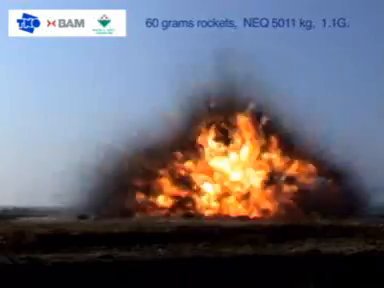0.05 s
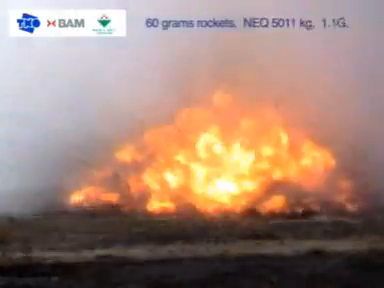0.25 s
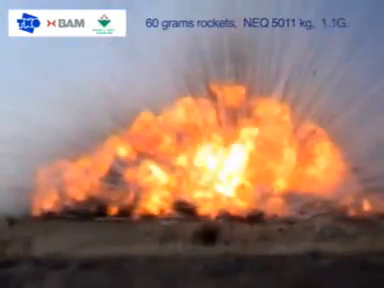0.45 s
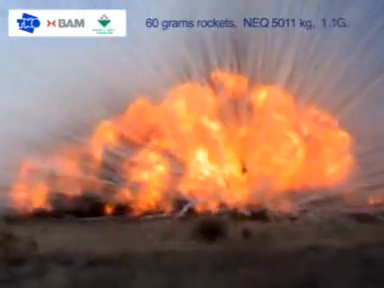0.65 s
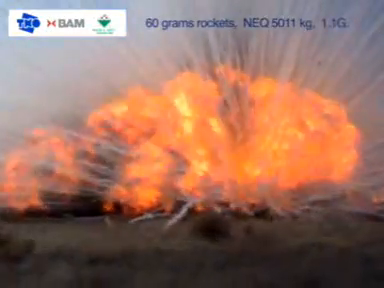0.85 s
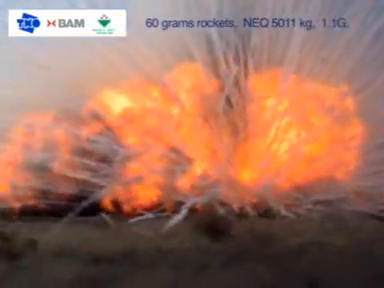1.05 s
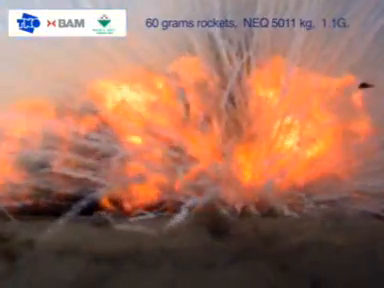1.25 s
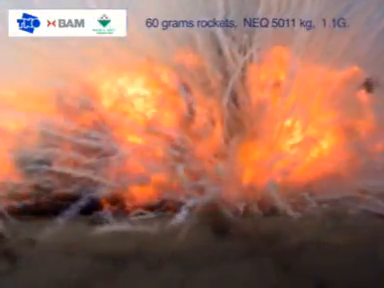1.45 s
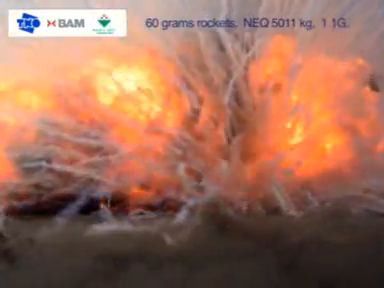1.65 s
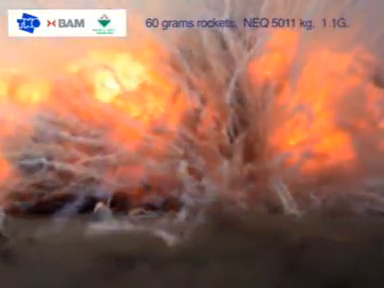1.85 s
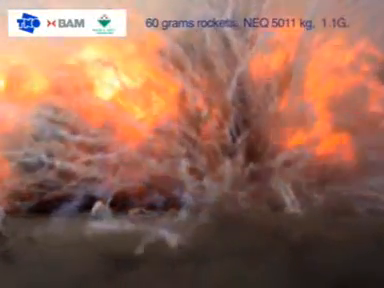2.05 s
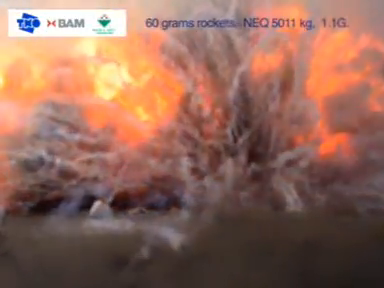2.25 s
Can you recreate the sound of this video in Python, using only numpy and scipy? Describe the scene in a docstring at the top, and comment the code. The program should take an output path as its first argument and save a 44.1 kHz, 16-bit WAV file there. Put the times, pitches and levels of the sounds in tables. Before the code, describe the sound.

A fireworks stockpile explodes far across an open field. After faint wind, ground shock knocks and rattles the microphone stand at 0.2 seconds. Sharp cracks hit at 0.35 seconds, opening into a loud, dense roar that overloads the microphone. From 1.1 seconds the roar eases into deep rumble with scattered distant booms, continuing until about 2.3 seconds. A few nearer rockets hiss briefly past around 1.4 seconds.

```python
"""A stockpile of fireworks explodes far off across an open field: thousands of rockets burst in a dense
roar over deep rumble and single booms, and a few nearer ones hiss past. The ground shock reaches the
microphone first and shakes the camera stand; then the air blast cracks in. Light wind comes before both.
The microphone overloads, and the roar chokes for a few milliseconds now and then."""
import sys
import numpy as np
from scipy import signal
from scipy.fft import rfft, irfft
from scipy.io import wavfile
from scipy.ndimage import uniform_filter1d

SR = 44100
rng = np.random.default_rng(int(sys.argv[2]) if len(sys.argv) > 2 else 0)


def master(y):
    """Save y as 16-bit WAV."""
    cut = np.clip(np.atleast_2d(y).T, -1, 1)
    pcm = np.round(cut * 32767)  # scale
    wavfile.write(sys.argv[1], SR, pcm.astype(np.int16))


N = 101429
T = np.arange(N) / SR
F = np.maximum(np.arange(N // 2 + 1) * SR / N, 1)
SHOCK_S, BLAST_S = .2065, .353  # arrival through the soil, then through the air

# Course of the explosion. Each row: time in seconds, then rumble, body, middle and treble in dB.
BLAST_LEVELS = [(.352, -19, -22, -14, -17), (.363, -14, -43, -21, -21), (.374, -43, -60, -29, -16.5),
                (.376, -24, -30, -21, 3), (.384, -29, -20, -42, -22.5), (.389, -19, -9, -0.5, -7),
                (.411, -17, -5.5, -3, -9.5), (.42, -18, -5, -8, -12.5), (.44, -19, -2, -11, -13.5),
                (.61, -18, -4.5, -6, -7.5), (.7, -12, -10, -9, -12.5), (.9, -13, -10, -10.5, -21.5),
                (.95, -9.5, -14.5, -13, -24), (1.07, -10.5, -10, -11.5, -23),
                (1.1, -7.5, -18.5, -18.5, -31.5), (1.28, -12, -19, -25, -26),
                (1.42, -12.5, -20, -24.5, -24.5), (1.52, -9, -21.5, -24.5, -26.5),
                (1.57, -14, -27.5, -32, -33.5), (1.68, -15, -21, -26.5, -30),
                (1.74, -21, -26.5, -27.5, -34), (1.78, -14.5, -24, -31, -28),
                (1.81, -13.5, -26, -29, -34.5), (1.86, -15, -25, -28, -31.5), (1.91, -14.5, -28, -29, -36),
                (2.03, -18.5, -31.5, -25, -38.5), (2.08, -19.5, -28.5, -31, -36.5),
                (2.3, -20.5, -26, -28.5, -37)]


def roar():
    """Countless distant bursts merge in three bands that swell, flicker and choke."""
    # Colour of the bursts. Each row: frequency in Hz, spectral level in dB.
    colour = [(92, -8), (177, -7.5), (246, -12), (752, -9.5), (1690, -14), (2240, -14), (8590, -23.5),
              (12900, -28), (16800, -65), (22000, -120)]
    # Body, middle and treble. Each row: centre in Hz, half-width in octaves.
    bands = [(520, 1.57), (2200, 1.125), (6500, 1.39)]
    # Moments when the roar chokes. Each row: time in seconds, length in seconds, dip in dB.
    chokes = [(.4148, .006, -14), (.7094, .003, -11), (.7278, .003, -11), (.7724, .004, -11),
              (.7829, .003, -13), (.8759, .004, -11), (.9154, .003, -12), (.9329, .004, -18),
              (.9372, .003, -17), (.9422, .003, -12), (1.0388, .004, -11), (1.0945, .004, -14),
              (1.1018, .005, -15), (1.1277, .002, -10), (1.1635, .003, -8), (1.1774, .002, -9),
              (1.1813, .002, -8)]
    bursts = spread(*(scatter(per_s=2500, spread_db=3, share=.3) for _ in range(2)))
    spectrum = rfft(bursts) * undb(along_hz(colour))
    flicker_db = .8 * walk(rate_hz=25.06)
    choke_db = sum(db * bump(s, length, order=4) for s, length, db in chokes)
    out = 0
    for column, (hz, octaves) in enumerate(bands, start=2):
        layer = unit(irfft(spectrum * np.exp(-(np.log2(F / hz) / octaves) ** 2), N))
        level_db = curve(BLAST_LEVELS, column) + flicker_db + choke_db + .5 * walk(rate_hz=12.08)
        out = out + layer * undb(level_db)
    return out * (T > BLAST_S)


def rumble():
    """Overlapping booms roll across the field beneath the roar."""
    # Colour of the rumble. Each row: frequency in Hz, spectral level in dB.
    colour = [(20, -6.5), (40, 2.5), (70, 2.5), (100, -1.5), (140, -6.5), (200, -16), (300, -21.5),
              (600, -35), (22000, -90)]
    bangs = spread(scatter(per_s=45, spread_db=2, share=.3), rng.standard_normal(N))
    deep = unit(irfft(rfft(bangs) * undb(along_hz(colour)), N))
    return deep * undb(curve(BLAST_LEVELS)) * (T > BLAST_S)


def cracks():
    """The front of the air blast reaches the microphone as short, sharp reports."""
    # Each row: start in seconds, level in dB, pitch in Hz.
    reports = [(.353, 12, 2200), (.356, 8, 1900), (.363, 12, 1900), (.3643, 10, 1900), (.3755, 9, 2200),
               (.378, 7, 1900), (.3873, 6, 1500)]
    return sum(-ring(clicks([(s, db)]), hz, t60_s=.0012) for s, db, hz in reports)


def booms():
    """Single far explosions stand out as deep thuds with a soft front."""
    # Each row: start in seconds, level ahead of the softening filter in dB, pitch in Hz.
    blasts = [(1.114, -2.5, 190), (1.16, -5.5, 141), (1.317, -11, 119), (1.552, -5, 113.4), (1.675, -6, 89),
              (1.727, -4, 87), (1.76, -5, 94.6), (1.888, -4.5, 82), (1.943, -5.5, 100.4), (2.062, -5.5, 85),
              (2.114, -7, 94)]
    thuds = sum(ring(clicks([(s, db)]), hz, t60_s=.13) for s, db, hz in blasts)
    return spread(band(thuds, 40, 190), np.zeros(N))


def ground_shock():
    """Knocks and weaker jolts through the soil ring the stand; bite, grit and rattles ride on top."""
    # Modes of the stand. Each row: frequency in Hz, relative level in dB, 60 dB decay time in seconds.
    modes = [(110, -8, .07), (195, 3, .035), (330, -3, .008), (616, -18, .005)]
    # Hard knocks in the stand. Each row: start in seconds, relative thump in dB, bite in dB.
    knocks = [(0.207, -5, -31), (0.2095, 6, -47), (0.2134, 7, -34), (0.2251, 4, -30), (0.2438, 5, -39),
              (.2504, 0, -48), (.26, 1, -46), (0.2709, 0.5, -50), (0.2867, 5, -34), (0.297, 2, -45),
              (0.3136, -0.5, -43), (0.3305, -14, -22), (0.336, -1.5, -44), (.3472, -2, -33)]
    # Loose parts rattling. Each row: start in seconds, level in dB.
    rattles = [(0.2174, -45), (0.2366, -29), (0.2575, -31.5), (0.2926, -32), (0.3014, -34), (0.3108, -34),
               (0.3315, -25)]
    gap_spread, size_spread = rng.standard_normal((60, 2)).T
    jolt_s = SHOCK_S + np.cumsum(np.exp(.3 * gap_spread) / 175)  # about 175 jolts a second
    jolt_db = -3 + 2 * size_spread
    shaking = clicks(np.array([jolt_s, jolt_db]).T) * (T < BLAST_S) + clicks(knocks)
    stand = band(sum(undb(db) * ring(shaking, hz, t60) for hz, db, t60 in modes), 43, 900, order=1)
    shock_rms = np.sqrt(np.mean(stand[(T > SHOCK_S) & (T < BLAST_S)] ** 2))
    stand = stand / shock_rms * undb(-12)
    bite_decay = fade(clicks([(s, db) for s, _, db in knocks]), t60_s=.008)
    bite = bite_decay * unit(band(rng.standard_normal(N), 1000, 3100, order=1))
    rattle_decay = fade(clicks(rattles), t60_s=.0098)
    rattle = rattle_decay * unit(band(rng.standard_normal(N), 7210, 12154, order=3))
    grains = unit(band(scatter(per_s=830, spread_db=4.6, share=.86), 690, 1800))
    grit = np.abs(stand) * grains * undb(-29)
    return spread(stand + bite + rattle + grit, side=1.7 * rng.standard_normal(N) * rattle_decay)


def whooshes():
    """Nearer rockets fly past the microphone with a brief, bright hiss."""
    # Each row: loudest moment in seconds, length in seconds, level in dB.
    passes = [(1.395, 0.014, -20.5), (1.409, 0.019, -19), (1.438, 0.0069, -14.5), (1.506, 0.025, -24.5)]
    hiss = unit(band(spread(*rng.standard_normal((2, N))), 2800, 10500))
    return hiss * sum(undb(db) * bump(s, length) for s, length, db in passes)


def quiet_field():
    """Light wind on the microphone until the shock arrives, and the microphone's own steady hiss."""
    # Gusts. Each row: time in seconds, level in dB.
    gusts = [(.056, -34), (.072, -12), (.095, -40), (.14, -17), (.16, -30), (.2, -53)]
    wind = unit(band(rng.standard_normal(N), 28, 61, order=3)) * undb(curve(gusts)) * (T < SHOCK_S)
    hiss = band(spread(*rng.standard_normal((2, N))), 250, 6500, order=1) * undb(-47.5)
    fade_in = np.clip((T - .056) / .003, 0, 1)
    return (wind + hiss) * fade_in


def spread(mid, side):
    """Stereo at the microphone: bass alike, treble wide, the right louder, the left slightly early."""
    # Likeness of the channels. Each row: frequency in Hz, squared correlation from 0 to 1.
    likeness = [(60, 0.96), (300, 0.96), (700, 0.94), (1300, 0.63), (2700, 0.18), (5000, 0.12),
                (8000, 0.02), (12400, 0.15)]
    # Lean to the right. Each row: frequency in Hz, left minus right in dB.
    balance = [(60, -6.5), (200, -2.5), (640, -3.5), (2100, -3), (12400, -1)]
    left_lead_s = .000015
    alike = np.sqrt(np.clip(along_hz(likeness), 0, 1))
    shared = rfft(mid) * np.sqrt((1 + alike) / 2)
    opposed = rfft(side) * np.sqrt((1 - alike) / 2)
    lean = undb(along_hz(balance) / 2) * np.exp(1j * np.pi * F * left_lead_s)
    return np.array([irfft((shared + opposed) * lean, N), irfft((shared - opposed) / lean, N)])


def scatter(per_s, spread_db, share):
    """Random bangs of uneven size carry a share of the power; smooth noise carries the rest."""
    chance, size = rng.random((N, 2)).T
    bangs = (chance < per_s / SR) * undb(-spread_db * np.log(1 - size))
    return np.sqrt(share) * unit(bangs - bangs.mean()) + np.sqrt(1 - share) * rng.standard_normal(N)


def ring(x, hz, t60_s):
    """One decaying mode struck by x."""
    pole = np.exp(2j * np.pi * hz / SR - np.log(1000) / (t60_s * SR))
    return signal.lfilter([1], [1, -pole], x).imag


def clicks(rows):
    """One impulse for each row that begins with seconds and dB."""
    seconds, db = np.array(rows).T[:2]
    x = np.zeros(N)
    np.add.at(x, (seconds * SR).astype(int), undb(db))
    return x


def fade(x, t60_s):
    """Each impulse becomes a decaying envelope."""
    return signal.lfilter([1], [1, -np.exp(-np.log(1000) / (t60_s * SR))], x)


def walk(rate_hz):
    """Glides between random levels, with an RMS of 1."""
    hold = int(SR / rate_hz)
    steps = np.repeat(rng.standard_normal(N // hold + 1), hold)
    return unit(uniform_filter1d(steps, hold)[:N])


def bump(s, length_s, order=2):
    return np.exp(-np.abs((T - s) / (length_s / 2)) ** order)


def band(x, lo_hz, hi_hz, order=2):
    return signal.sosfilt(signal.butter(order, [lo_hz, hi_hz], "band", fs=SR, output="sos"), x)


def curve(table, column=1):
    rows = np.array(table)
    return np.interp(T, rows[:, 0], rows[:, column])


def along_hz(table):
    rows = np.array(table)
    return np.interp(np.log(F), np.log(np.maximum(rows[:, 0], 1)), rows[:, 1])


def undb(db):
    return 10 ** (np.asarray(db) / 20)


def unit(x):
    return x / np.sqrt(np.mean(x ** 2))


def scene():
    """Everything that reaches the microphone across the field."""
    return quiet_field() + ground_shock() + cracks() + roar() + rumble() + booms() + whooshes()


def record(dry):
    """The microphone saturates and sheds deep bass; the converter clips at full scale."""
    # Where the microphone saturates. Each row: time in seconds, ceiling in dB.
    overload = [(.7, 3), (.95, -1), (1.1, -3)]
    low_cut_hz, narrow_hz, mic_top_hz, converter_top_hz = 135, 7650, 12030, 15800
    ceiling = undb(curve(overload))
    mic = ceiling * dry / np.sqrt(ceiling ** 2 + dry ** 2)
    mic = signal.sosfilt(signal.butter(2, low_cut_hz, "high", fs=SR, output="sos"), mic)
    side = (mic[0] - mic[1]) / 2
    side_treble = signal.sosfiltfilt(signal.butter(2, narrow_hz, "high", fs=SR, output="sos"), side)
    narrowed = mic - np.outer([1, -1], side_treble)  # the stereo image narrows in the high treble
    dulled = signal.sosfilt(signal.ellip(8, .2, 70, mic_top_hz, fs=SR, output="sos"), narrowed)
    clipped = np.clip(dulled, -1, 1)
    return signal.sosfilt(signal.ellip(4, .2, 30, converter_top_hz, fs=SR, output="sos"), clipped)


dry = scene()
out = record(dry)
master(out)
```